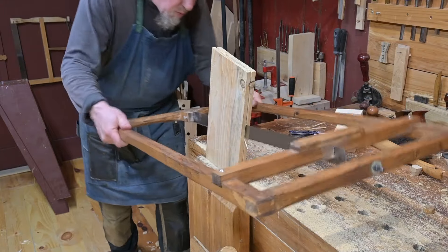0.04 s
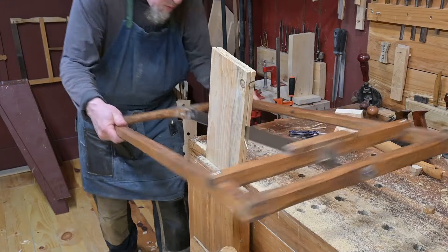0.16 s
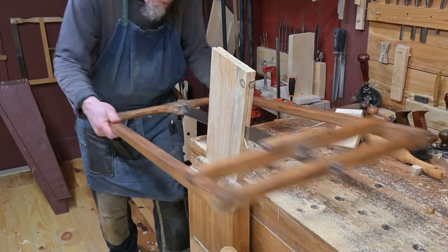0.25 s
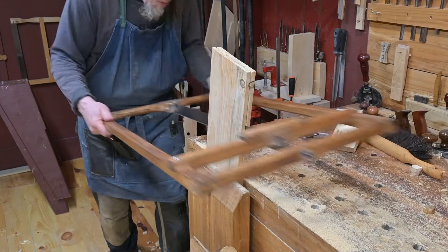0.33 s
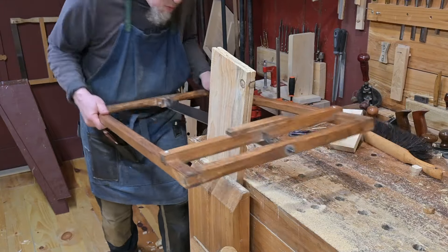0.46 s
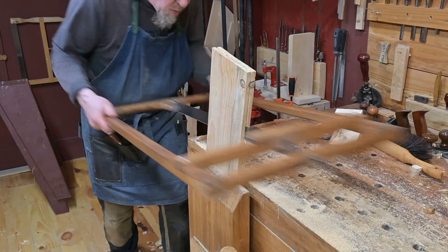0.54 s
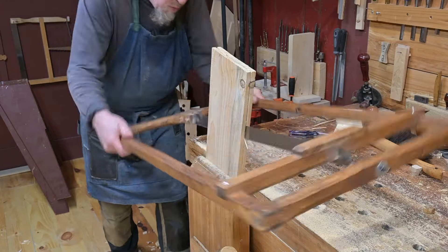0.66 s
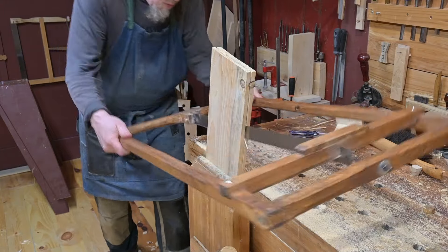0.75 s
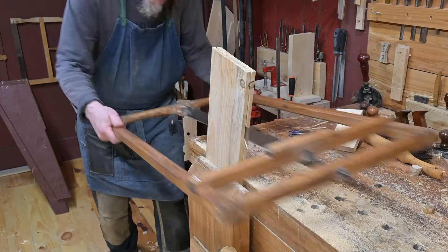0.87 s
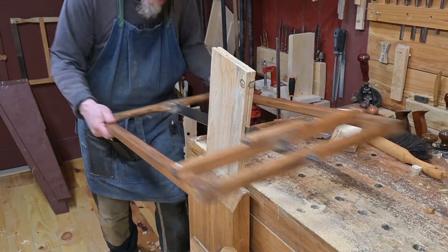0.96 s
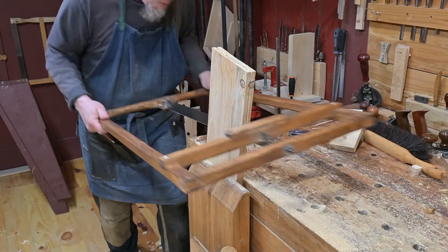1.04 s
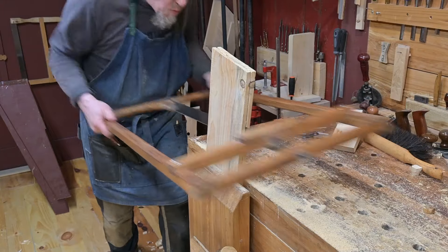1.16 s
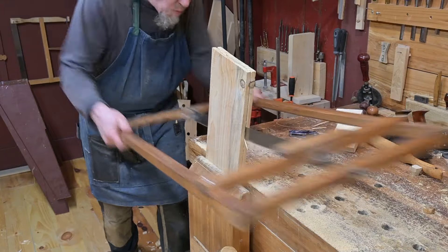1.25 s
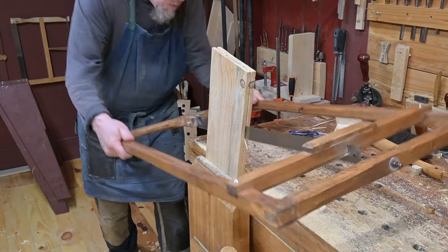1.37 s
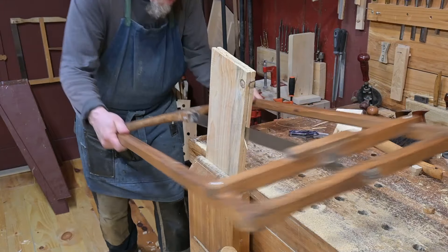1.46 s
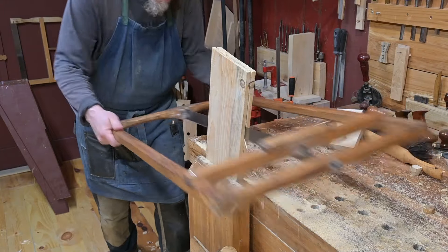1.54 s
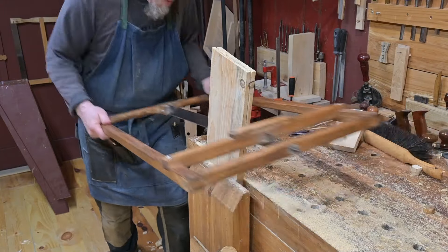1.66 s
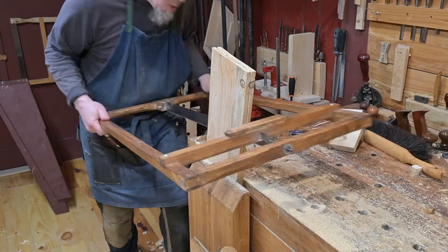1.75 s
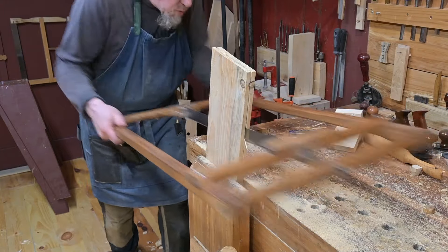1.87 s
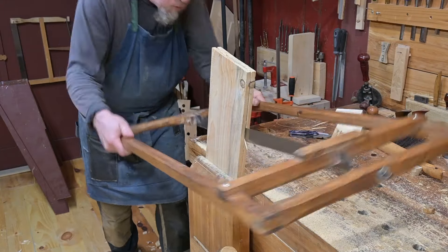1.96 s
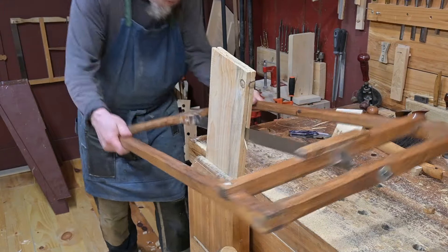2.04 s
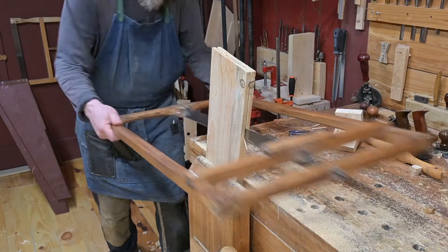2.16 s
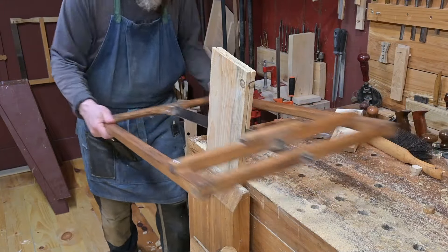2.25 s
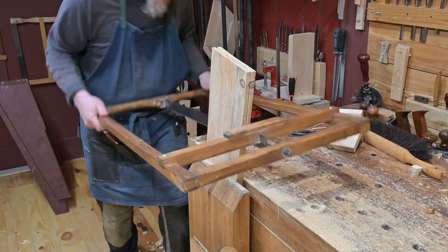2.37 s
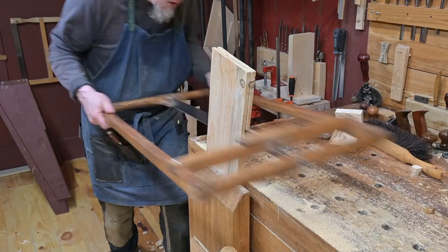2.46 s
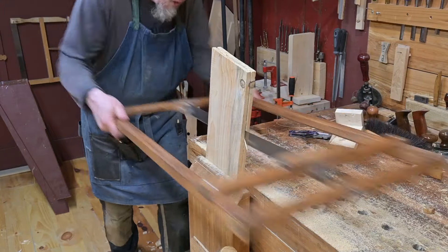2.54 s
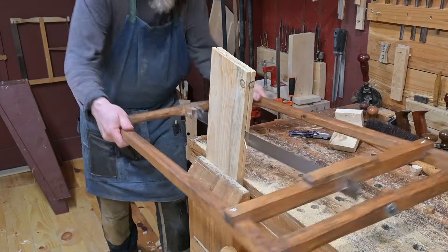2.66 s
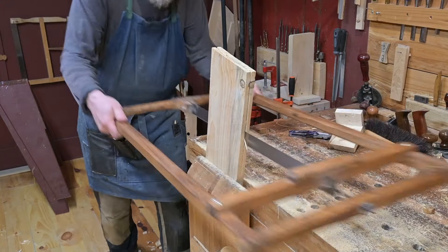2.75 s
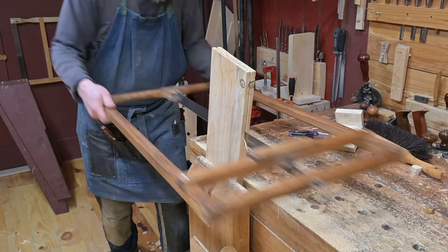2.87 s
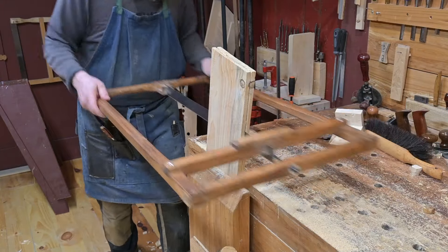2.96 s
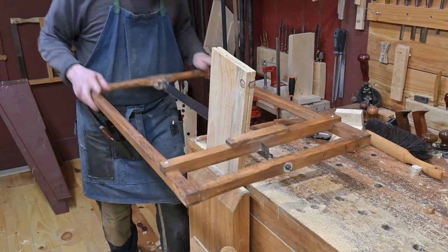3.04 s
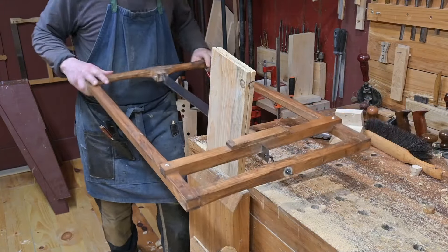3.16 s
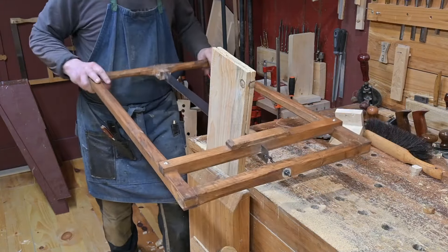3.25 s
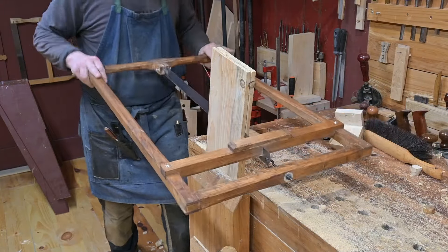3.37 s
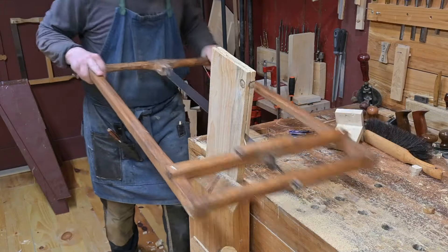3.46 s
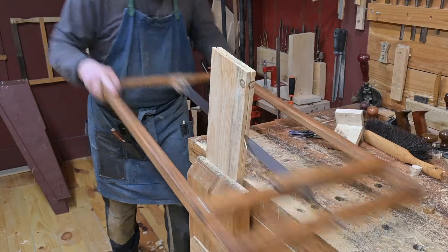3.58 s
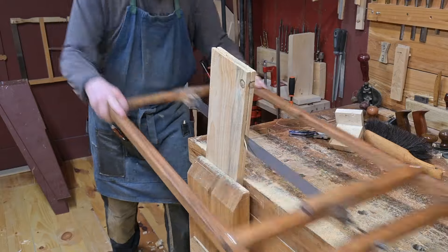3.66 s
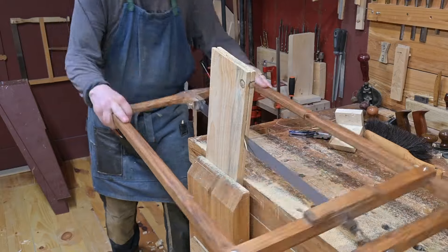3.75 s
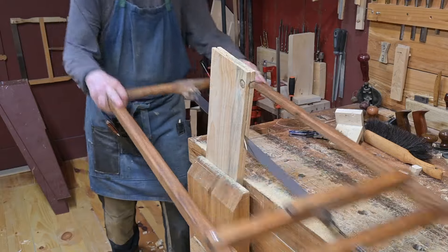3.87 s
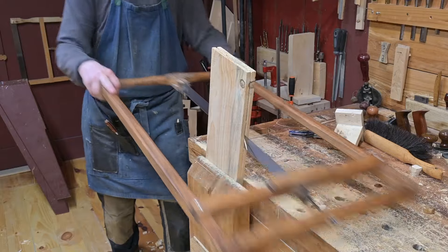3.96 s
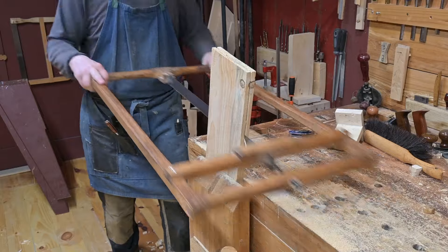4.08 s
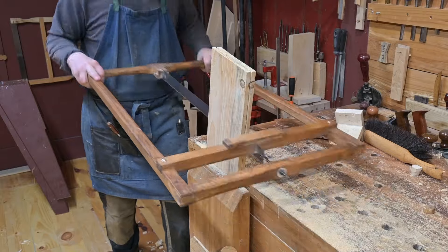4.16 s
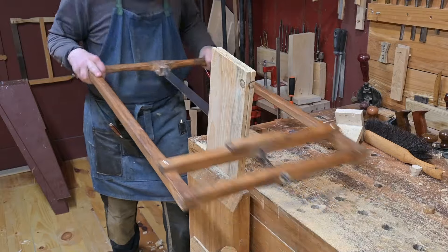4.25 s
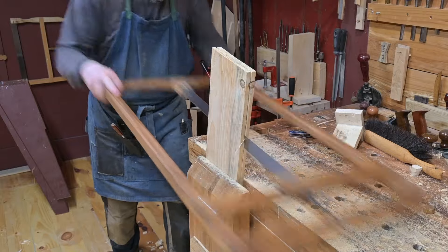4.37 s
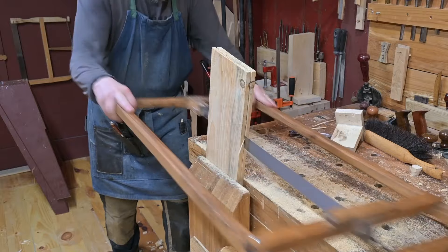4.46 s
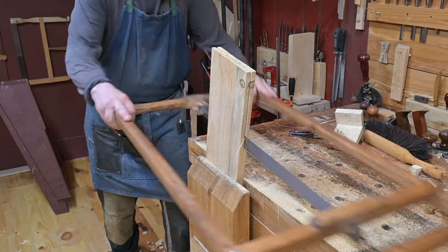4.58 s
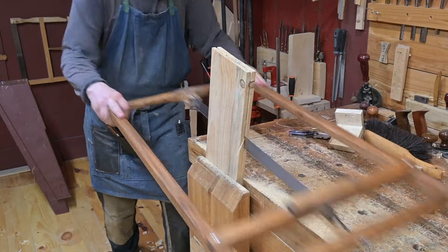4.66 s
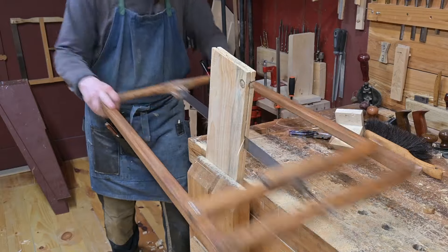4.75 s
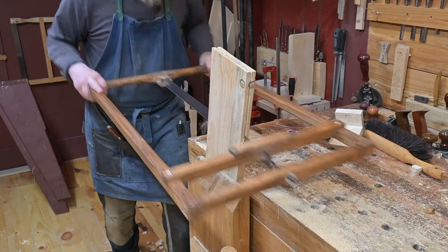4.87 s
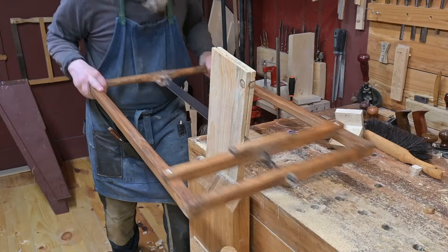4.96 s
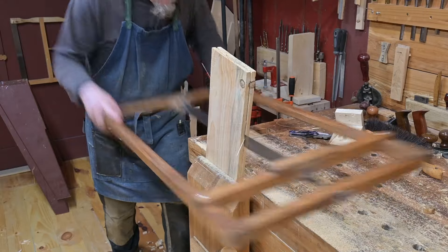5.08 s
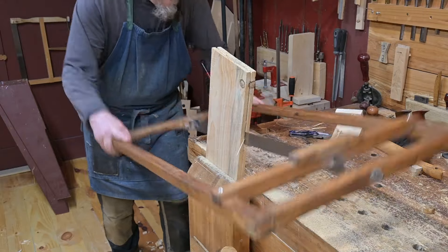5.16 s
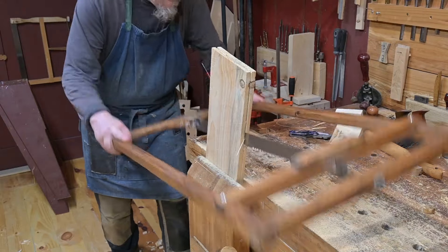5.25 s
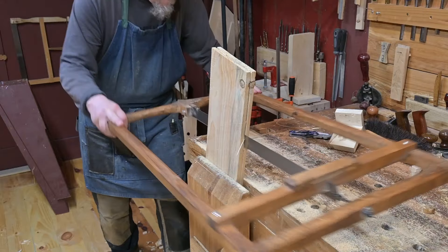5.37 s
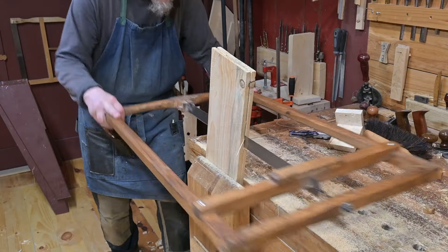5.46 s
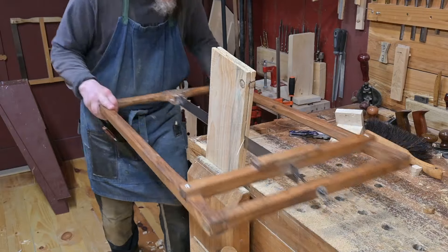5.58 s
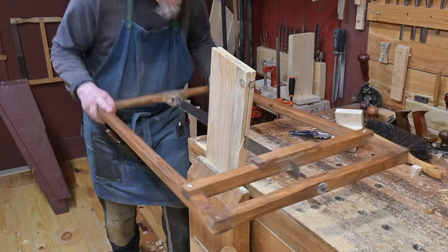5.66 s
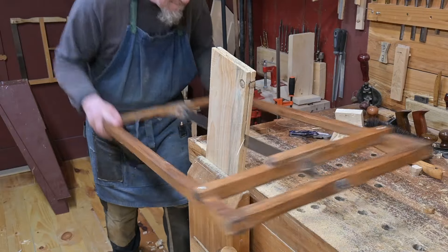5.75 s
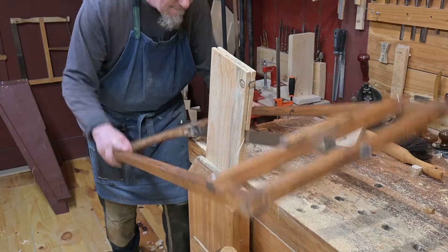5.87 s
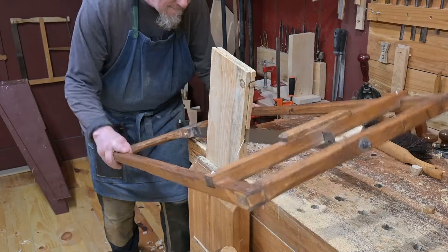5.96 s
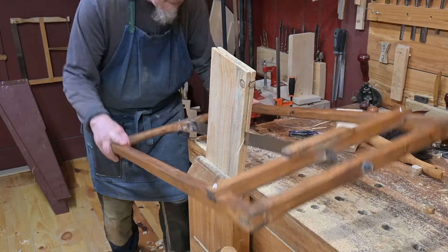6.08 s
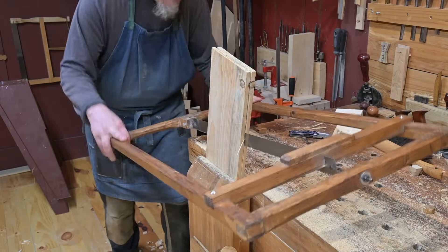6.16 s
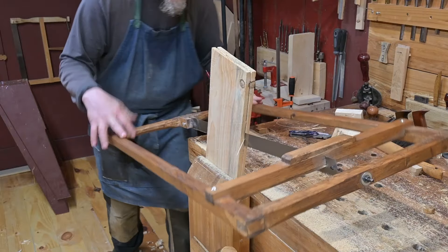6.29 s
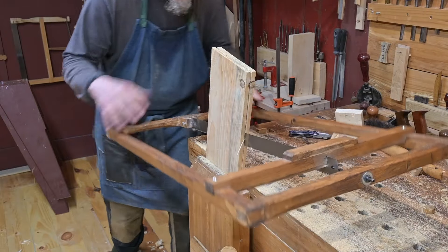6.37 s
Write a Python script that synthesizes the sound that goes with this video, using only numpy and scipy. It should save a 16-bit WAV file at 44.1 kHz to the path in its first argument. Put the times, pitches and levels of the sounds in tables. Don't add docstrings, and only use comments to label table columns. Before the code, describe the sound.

A big wooden frame saw cuts a pine board in a bench vise, close to one mono microphone in a small workshop. Quick, bright push rasps alternate with slower, slightly duller pulls, about three strokes a second. The board and frame hum hollowly beneath. After a short gap midway the strokes resume, a little slower; a splinter snaps, the saw stops, and faint ticks remain.

```python
import sys
import numpy as np
from scipy import signal
from scipy.fft import rfft, irfft, next_fast_len
from scipy.io import wavfile
from scipy.ndimage import uniform_filter1d, map_coordinates

SR = 44100
rng = np.random.default_rng(int(sys.argv[2]) if len(sys.argv) > 2 else 0)


def voltage_ratio(decibels):
    exponent = np.asarray(decibels, float) / 20
    return 10 ** exponent


def to_wav(sig):
    pcm = np.clip(np.atleast_2d(sig), -1, 1) * 32767
    pcm = np.round(pcm).astype(np.int16)
    wavfile.write(sys.argv[1], SR, pcm.T)


N = 283122


def unit(x):
    return x / np.sqrt(np.mean(x ** 2) + 1e-20)


def along(points, hz):
    point_hz, value = np.transpose(points)
    return np.interp(np.log(hz + 1), np.log(point_hz + 1), value)


def wobble(rate_hz):
    knots = rng.standard_normal(int(N * rate_hz / SR) + 4)
    return map_coordinates(knots, [np.arange(N) * rate_hz / SR])


def filtered(x, response):
    size = next_fast_len(N + SR // 2)
    return irfft(rfft(x, size) * response(np.fft.rfftfreq(size, 1 / SR)), size)[..., :N]


def shaped(x, points):
    return unit(filtered(x, lambda hz: voltage_ratio(along(points, hz))))


def modes(table):
    def response(hz):
        total = 0
        for k, (mode_hz, width_hz, level_db) in enumerate(table):
            damping = 1j * hz * width_hz
            total = total + (-1) ** k * voltage_ratio(level_db) * damping / (mode_hz ** 2 - hz ** 2 + damping)
        return total
    return response


# hz, level_db_per_hz
AIR = [(24, -57), (40, -17), (262, 1.5), (328, -23.5), (555, -5), (1440, -10.5), (2260, -6.5),
       (13700, -23.5), (15900, -26)]


def air():
    return voltage_ratio(-75.5 + 1 * wobble(11)) * shaped(rng.standard_normal(N), AIR)


# hz, t60_s
SHOP = [(200, 0.56), (1500, 0.46), (5000, 0.087), (14000, 0.14)]


def shop(x, count=4):
    noise = rng.standard_normal((count, SR // 2))
    hz, t, z = signal.stft(noise, SR, nperseg=256)
    decay = voltage_ratio(-60 * t / along(SHOP, hz)[:, None])
    tails = signal.istft(z * decay, SR, nperseg=256)[1]
    place = np.arange(N) / SR / .2 - np.arange(count)[:, None]
    distance = np.abs((place + count / 2) % count - count / 2)
    parts = x * np.sqrt(np.clip(1 - distance, 0, 1))
    delayed = np.pad(parts, ((0, 0), (300, 0)))
    return signal.fftconvolve(delayed, tails / np.linalg.norm(tails[0]), axes=1).sum(0)[:N]


# centre_s, low_hz, high_hz, level_db
PUFFS = [(.47, 4200, 4600, -74), (2.33, 4100, 5200, -46), (2.33, 11000, 14000, -56),
         (2.56, 4100, 5180, -40), (2.56, 8200, 9700, -46), (3.33, 4600, 7000, -70),
         (3.51, 10300, 11800, -54), (4.07, 5600, 8950, -43), (4.65, 14300, 15800, -58),
         (4.79, 14300, 15800, -54)]


def side_puffs():
    out, length = np.zeros(N + SR), 1280
    hz = np.fft.rfftfreq(length, 1 / SR)
    for centre_s, low_hz, high_hz, level_db in PUFFS:
        band = (hz > low_hz) * (hz < high_hz)
        puff = unit(irfft(rfft(rng.standard_normal(length)) * band))
        start = round(centre_s * SR) - length // 2
        out[start:][:length] += voltage_ratio(level_db) * puff * np.hanning(length) ** .5
    return out[:N] * [[1], [-1]]


# start_s, peak_db, pitch_hz, crackle_db
TICKS = [
    (5.336, -26.5, 4300, -12.5),
    (5.3544, -45.5, 2140, 1.5),
    (5.798, -21.5, 3250, -14.5),
         (3.428, -40, 3000, -14),
    (6.2135, -68, 7000, -6),
    (6.2655, -54, 2900, -22),
    (6.336, -53.5, 2600, -24),
    (6.36, -61, 2200, -22),
]


def ticks():
    out, t = np.zeros(N + SR), np.arange(SR // 8) / SR
    for start_s, peak_db, pitch_hz, crackle_db in TICKS:
        snap = np.sin(2 * np.pi * pitch_hz * t) * voltage_ratio(-60 * t / 0.0055) * (1 - np.exp(-t / 0.00007))
        crackle_decay = 3 * voltage_ratio(-60 * t / 0.0015) + voltage_ratio(-60 * t / .16)
        crackle = rng.standard_normal(len(t)) * voltage_ratio(crackle_db) * crackle_decay
        out[round((start_s + .0008) * SR):][:len(t)] += voltage_ratio(peak_db + 1.5) * (snap + crackle)

    def band(hz, low_hz=1200, high_hz=9000):
        return 1j * hz / (low_hz + 1j * hz) / (1 + 1j * hz / high_hz)
    return filtered(out[:N], band)


# start_s, length_s, from_hz, to_hz, hum_db
BITE = [
    (.52, .14, 305, 366, -41.5),
    (2.43, 0.089, 235, 265, -37.5),
    (3.565, 0.118, 247.6, 225, -28),
]
# start_s, length_s, from_hz, to_hz, hum_db
HUM = [(0, 0.027, 433, 446, -39), (.07, 0.087, 415, 413, -43.5), (2.12, 0.052, 323, 330, -37),
       (4.44, 0.16, 401, 432, -42.5), (.65, 0.13, 433.7, 414, -40.5), (.9, 0.035, 318, 328, -35),
       (1.2, 0.11, 395, 409, -36.5), (1.44, 0.084, 347, 297, -37), (1.91, .14, 411, 415, -38.5),
       (2.71, 0.17, 318, 337, -38.5), (2.84, .15, 249, 202, -43), (3.66, 0.16, 462, 438, -36),
       (3.68, 0.104, 200, 158, -44), (3.85, .09, 312, 350, -34), (3.91, 0.196, 563, 639, -39),
       (4.32, 0.16, 283.5, 364, -38.5), (4.645, 0.086, 314, 398, -31), (4.7, 0.107, 422, 429, -33.5),
       (4.81, 0.08, 357, 304, -35), (4.93, 0.14, 311.5, 327, -37), (5.05, 0.11, 257.5, 300, -34),
       (5.55, 0.052, 313, 320, -41), (5.71, 0.058, 392, 418, -47)]


def bite():
    out, unsteady, uneven = np.zeros(N), wobble(40), wobble(50)
    octave_db, swell_power = -3, 1.5
    for rows, octave, waver in ((BITE, voltage_ratio(octave_db), .01), (HUM, 0, .022)):
        for start_s, length_s, from_hz, to_hz, hum_db in rows:
            i = np.arange(int(start_s * SR), int((start_s + length_s) * SR))
            u = np.linspace(0, 1, len(i))
            tooth_hz = (from_hz + (to_hz - from_hz) * u) * (1 + waver * unsteady[i])
            phase = 2 * np.pi * np.cumsum(tooth_hz) / SR
            swell = np.abs(np.sin(np.pi * u)) ** swell_power * voltage_ratio(hum_db + 2.45 * uneven[i])
            out[i] += np.sqrt(2) * swell * (np.sin(phase) + octave * np.sin(2 * phase + 1))
    return out


# hz, level_db
RUMBLE = [(25, 3.5), (50, 3.5), (100, 1.5), (200, -5), (300, -30.5)]


def bench(bench_db):
    return voltage_ratio(bench_db + 17.5) * shaped(rng.standard_normal(N), RUMBLE)


# mode_hz, width_hz, level_db
VISE = [(200, 110, 0)]


def vise(kerf, bench_db):
    over_bench_db, deepens_db_per_s = 9, 1
    level_db = bench_db + over_bench_db + deepens_db_per_s * np.arange(N) / SR
    return voltage_ratio(level_db) * unit(filtered(kerf, lambda hz: modes(VISE)(hz) ** 2))


# mode_hz, width_hz, level_db
BOARD = [(240.6, 51, -7.5), (300, 46.4, 1.5), (344.7, 51, -1), (417, 33, -1), (502.4, 76, -8)]


def board(shake, level_db):
    def stiff(hz, corner_hz=240):
        return 1 / (1 + (corner_hz / (hz + 1)) ** 4)
    return voltage_ratio(level_db - 3) * unit(filtered(shake, lambda hz: modes(BOARD)(hz) * stiff(hz)))


# mode_hz, width_hz, level_db
FRAME = [(573, 33, -0.5), (718, 61, 1), (804, 43, 0), (918, 59, 4), (1022, 96, 2), (1161, 78, 1.5),
         (1345, 250, -13.5)]
# mode_hz, width_hz, level_db
BLADE = [(1446, 60, -5.5), (1780, 75, -1), (3040, 90, -13), (3930, 37, -0.5)]


def frame_and_blade(shake, level_db):
    frame = voltage_ratio(level_db - 2.5) * unit(filtered(shake, modes(FRAME)))
    ring = voltage_ratio(level_db / 2 - 11) * unit(filtered(shake, modes(BLADE)))
    return frame + ring


# hz, level_db
STEEL = [(5000, -15.5), (8000, -3.5), (9000, -5.5), (10500, -6.5), (12300, -2), (14000, -4.5),
         (16000, -9.5)]


def steel(kerf, level_db):
    return voltage_ratio(level_db + 1.6 * wobble(12)) * shaped(kerf, STEEL)


# hz, level_db
RASP = [(500, -21), (1200, -3.5), (1500, -2), (1800, 2), (2300, -1.5), (3300, -1.5), (4500, -4.5),
        (6000, -11), (8500, -19), (11000, -37)]


def rasp(kerf, bright_db):
    whole = shaped(kerf, RASP)
    dull = filtered(whole, lambda hz, split_hz=2600: 1 / (1 + (hz / split_hz) ** 4))
    return voltage_ratio(-bright_db / 2) * dull + voltage_ratio(bright_db / 2) * (whole - dull)


def tearing(spread_db, clump_db, patchy_db):
    fibres = rng.standard_normal(N) * voltage_ratio(spread_db * wobble(1500) + clump_db * wobble(120))
    z = signal.stft(fibres, nperseg=512)[2]
    field = uniform_filter1d(rng.standard_normal(z.shape), size=6, axis=0)
    field = uniform_filter1d(field, size=8, axis=1)
    return signal.istft(z * voltage_ratio(patchy_db * unit(field)), nperseg=512)[1][:N]


# start_s, rise_s, hold_s, rasp_db, fall_db_per_s
PUSH = [(-.2, 0.052, 0.14, -26, 177), (.47, 0.067, .11, -29.5, 174), (1.108, 0.071, .12, -29.5, 165),
        (1.756, 0.049, 0.15, -30, 166), (2.404, 0.058, 0.14, -30, 157), (3.388, 0.19, 0.043, -30.5, 114),
        (4.226, 0.12, 0.13, -29.5, 171), (4.946, 0.082, .12, -30, 135), (5.66, 0.097, 0.065, -31.5, 156.5)]
# start_s, rise_s, hold_s, rasp_db, fall_db_per_s
PULL = [(.09, 0.22, 0.079, -30, 220), (.725, 0.2, 0.11, -30, 225), (1.385, 0.18, 0.12, -29.5, 220),
        (2.01, 0.19, 0.13, -30, 208), (2.67, .15, 0.16, -31, 212.5), (3.23, 0.1, 0.0077, -55.5, 199.5),
        (3.765, 0.19, 0.19, -30, 199), (4.535, 0.18, 0.16, -29.5, 208), (5.3, 0.19, 0.1, -35.5, 229.5),
        (6.06, 0.036, 0.088, -71.5, 154), (6.28, 0.13, .05, -75, 50)]
# over_rasp_db, rise_share, fall_lag_s, fall_share, sag_db_per_s
PUSH_LAWS = [
    (0.86, 1.01, -0.026, 0.88, 2.5),
    (4.36, 1.17, -0.036, 0.82, -12),
    (-8, 1.21, -0.016, 1.26, 14),
    (-6, 0.73, 0.038, 0.82, 8.5),
    (-6, 0.87, 0.018, 0.7, 9),
    (-41.5, 0.93, 0.098, 1.4, 20),
]
# over_rasp_db, rise_share, fall_lag_s, fall_share, sag_db_per_s
PULL_LAWS = [
    (-0.72, 1.35, 0.0095, 0.72, 28),
    (0.65, 1.33, 0.0045, 0.55, 27.5),
    (-13.5, 1.04, -0.0056, 0.87, 2),
    (-9.5, 0.36, 0.045, 0.88, -1.5),
    (-7.5, 1.01, 0.019, 1.13, -14),
    (-46, 0.21, 0.11, 1.1, 4),
]


def follow(layer):
    push_power, pull_power, knee_s = 1.55, 1.73, 0.0095
    t, power = np.arange(0, N, 32) / SR, 1e-14
    for rows, laws, grows in ((PUSH, PUSH_LAWS, push_power), (PULL, PULL_LAWS, pull_power)):
        over_db, rise_share, lag_s, fall_share, sag = laws[layer]
        start_s, rise_s, hold_s, rasp_db, fall = np.transpose(rows)[..., None]
        layer_rise_s = rise_s * rise_share
        speed = np.sin(np.pi / 2 * np.clip((t - start_s) / np.abs(layer_rise_s), 0, 1))
        held_s = np.clip(t - start_s - layer_rise_s, 0, hold_s + rise_s)
        late_s = t - (start_s + rise_s + hold_s + lag_s)
        fallen_db = fall_share * fall * (late_s + np.hypot(late_s, knee_s)) / 2
        level_db = rasp_db + over_db - sag * held_s - fallen_db
        power = power + ((speed ** grows * voltage_ratio(level_db)) ** 2).sum(0)
    return np.interp(np.arange(N) / SR, t, 10 * np.log10(power))


# time_s, pinch_db
GRIP = [(0, 0.5), (.3, -1.5), (.58, 2), (.95, -2.5), (1.22, -1), (1.599, -2), (1.87, 1), (2.22, -1),
        (2.52, 1.5), (2.87, 1.5), (3.3, 0), (3.65, 4), (4.02, 1.5), (4.38, -1), (4.76, 1.5), (5.08, 0),
        (5.5, 3), (5.799, -1)]


def saw():
    rasp_db, *others = [follow(layer) for layer in range(len(PUSH_LAWS))]
    bright_db, steel_db, board_db, frame_db, bench_db = [level_db - rasp_db for level_db in others]
    grip_db = np.interp(np.arange(N) / SR, *np.transpose(GRIP))
    bright_db = bright_db - 0.45 * grip_db
    board_db = board_db + grip_db
    frame_db = frame_db + 0.89 * grip_db
    bench_db = rasp_db + bench_db + 0.62 * grip_db + 3.4 * wobble(12)
    kerf = tearing(spread_db=-0.13, clump_db=0.55, patchy_db=1.39)
    shake = tearing(spread_db=-1.0, clump_db=1.5, patchy_db=1.0)
    cut = rasp(kerf, bright_db) + steel(kerf, steel_db)
    drone = board(shake, board_db) + frame_and_blade(shake, frame_db)
    return voltage_ratio(rasp_db - 0.5) * (cut + drone) + bench(bench_db) + vise(kerf, bench_db)


def scene():
    near = saw() + bite() + ticks()

    def bass_cut(hz, corner_hz=200):
        return (hz / corner_hz) ** 3 / np.sqrt(1 + (hz / corner_hz) ** 6)
    mono = filtered(near + voltage_ratio(-13.0) * shop(near), bass_cut) + air()
    return np.array([mono, mono])


def band_limit(x):
    return signal.sosfilt(signal.butter(12, 16090, fs=SR, output="sos"), x)


def record(dry):
    mix = filtered(dry, lambda hz, top_hz=15780: hz < top_hz) + side_puffs()
    return band_limit(mix)


dry = scene()
out = record(dry)
to_wav(out)
```